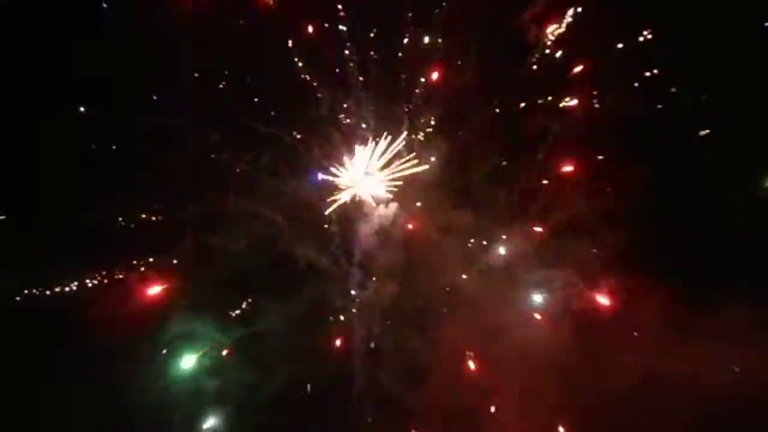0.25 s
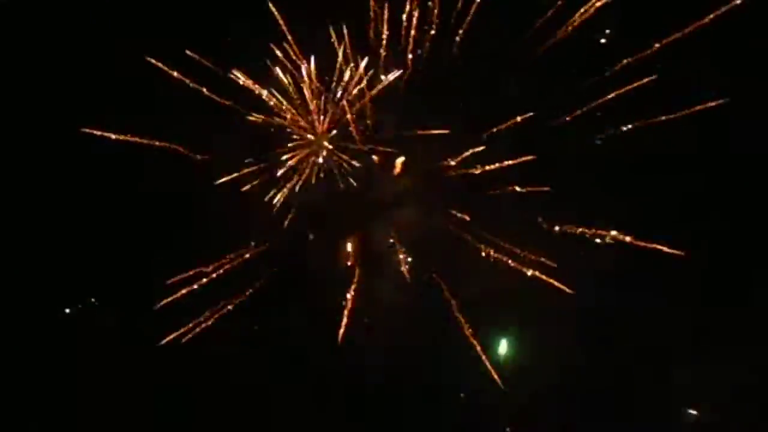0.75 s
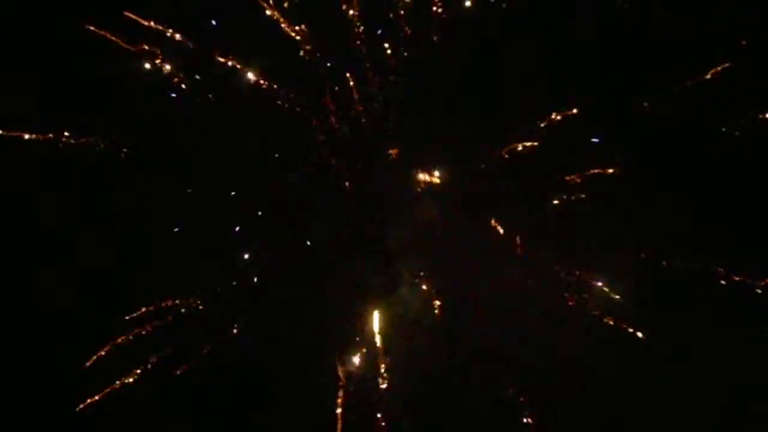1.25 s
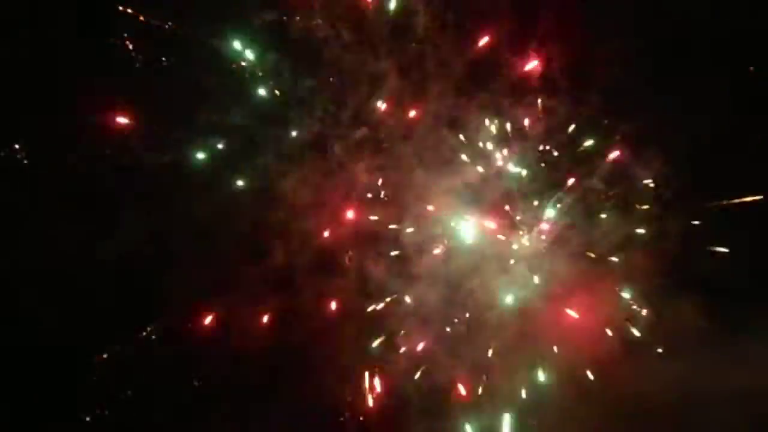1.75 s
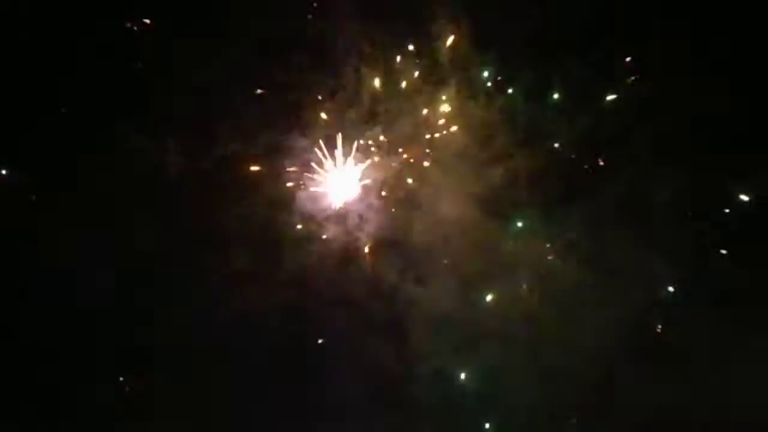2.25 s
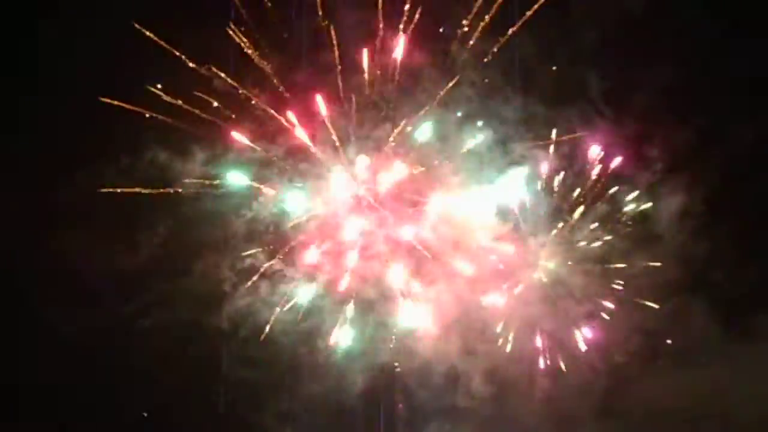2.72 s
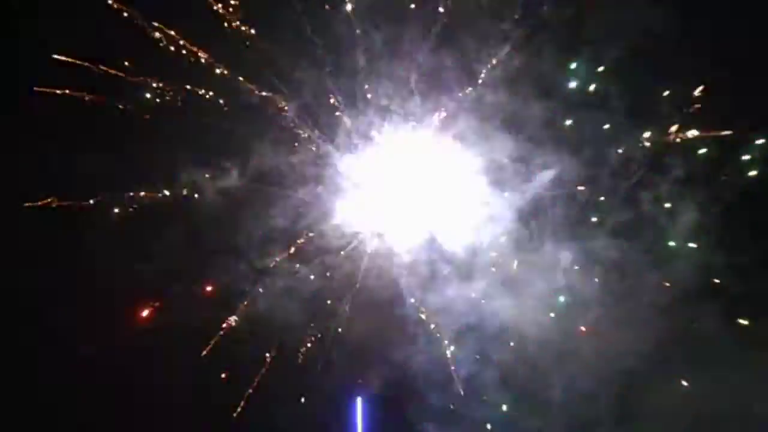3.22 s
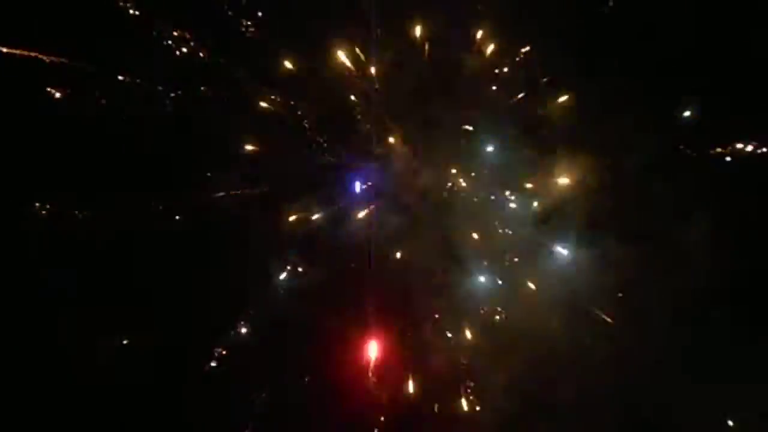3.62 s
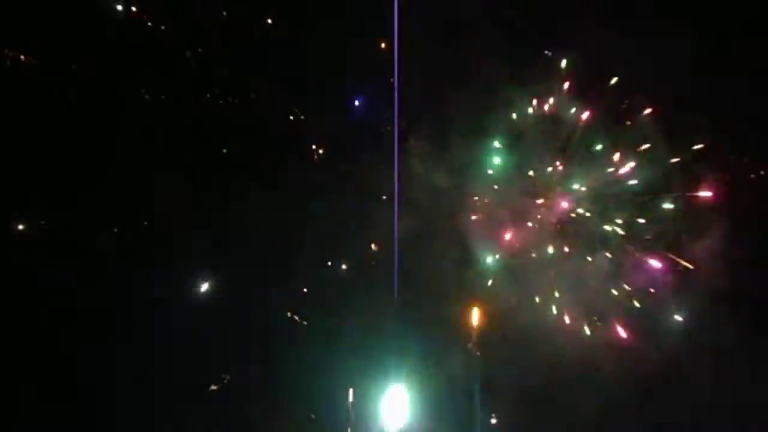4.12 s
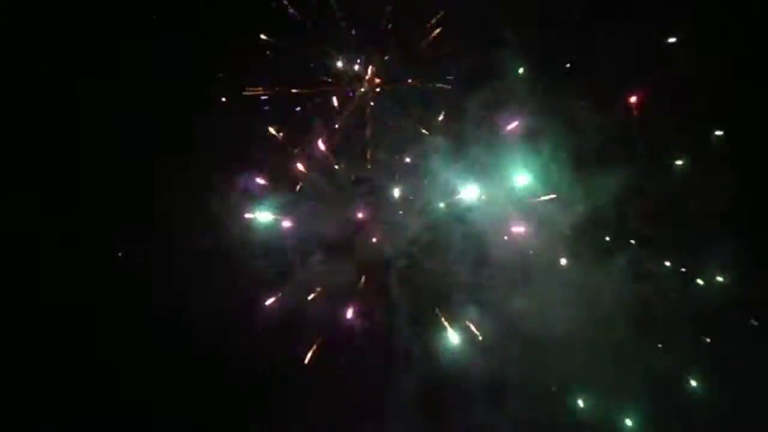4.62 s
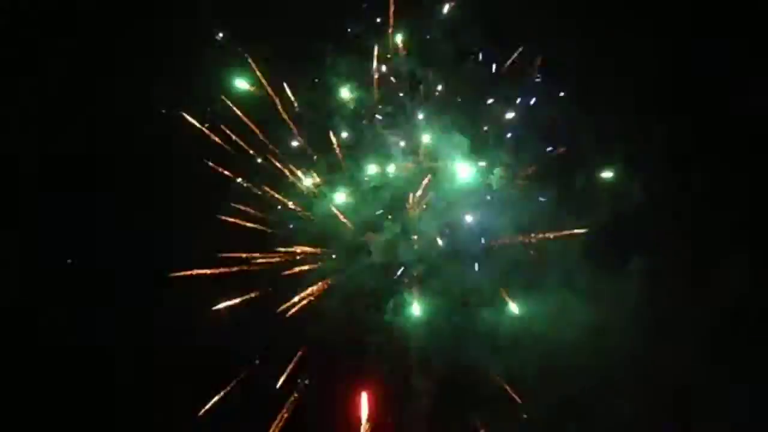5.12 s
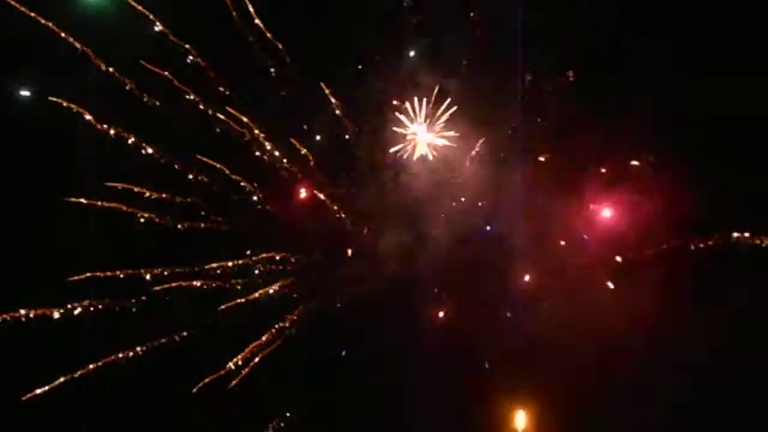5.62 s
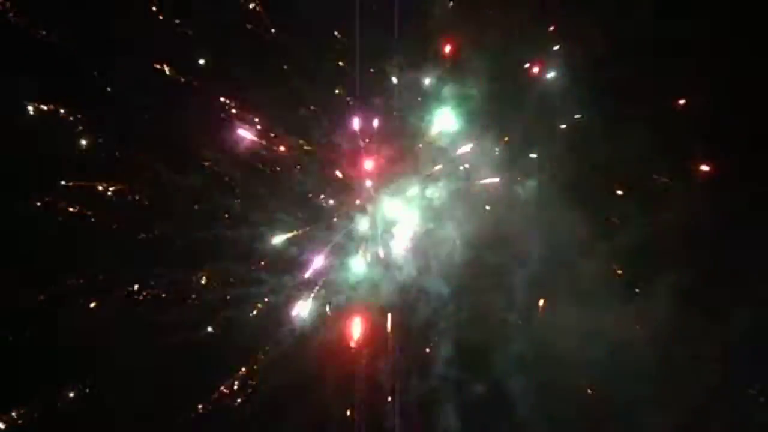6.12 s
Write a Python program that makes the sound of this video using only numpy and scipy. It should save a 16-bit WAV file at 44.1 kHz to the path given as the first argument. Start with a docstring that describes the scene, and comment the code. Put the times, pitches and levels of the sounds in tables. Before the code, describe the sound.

A dense night fireworks barrage: sharp overloaded bangs, irregular pops and double launch thumps over distant rumble, rushing comets and thin crackling fizz.

```python
"""Batteries of fireworks at night, close to a small microphone, over a distant roar, a rush and a fizz.
Pops open the scene and return throughout; shells soon burst overhead, and lift charges thump from 1.2 s on.
Each of these is a sudden push of air with a swing back, then scattered rattle and a longer noisy tail.
A burst also bounces off the ground about 10 ms later, and a wall answers about 0.12 s later.
Bursts knock the microphone's resting level off centre, and the strongest shocks overload its input."""
import sys
import numpy as np
from scipy import signal
from scipy.fft import rfft, irfft
from scipy.io import wavfile
from scipy.ndimage import uniform_filter1d

SR = 44100
rng = np.random.default_rng(int(sys.argv[2]) if len(sys.argv) > 2 else 0)


def unload_audio(sound):
    """Save the sound as a 16-bit wav file, at the path given as the first command line argument."""
    columns = np.transpose(np.atleast_2d(sound))
    # keep every value between -1 and 1, then stretch to whole-number steps
    steps = np.round(np.clip(columns, -1, 1) * 32767)
    wavfile.write(sys.argv[1], SR, steps.astype(np.int16))


N = 280464  # samples, about 6.4 s

# Fronts of shells bursting overhead; the faint row at 4.9946 s is a second front of the burst before it:
# start_s, crack_db, rebound_db, bias_jump (1 = full scale, before the input), bounce_delay_ms, bounce_db,
# bounce_bias_jump (same unit), scatter_db (before a shared boost), wall_echo_db
BURSTS = [(0.3678, 9.5, -3, 0.56, 10.3, -0.5, 0.27, -32.5, -15),
          (0.732, 5.5, 2, 0.82, 11.3, 5, -0.02, -34.5, -17),
          (1.4781, -1, 8, 0.89, 9.8, -4.5, -0.044, -38.5, -25),
          (1.5178, 5.5, -3, 0.013, 10.1, -6.5, 0.054, -43.5, -29),
          (2.0584, -1, -27, 2, 9.06, -1.5, -0.6, -28.5, -7),
          (2.3804, 8.5, 3, 0.46, 10.6, 6, 0.37, -36, -14.5),
          (2.6085, 10, 6, 0.84, 9.6, 1, -0.093, -38.5, -42),
          (2.684, 7, -1.5, -0.032, 9.7, -5.5, 0.09, -41, -25),
          (3.37, 11, 1.5, 1.02, 10.5, 4.5, -0.055, -34.5, -16.5),
          (3.863, 9.5, 9, 1.21, 10.3, -1.7, 0, -39.5, -29.5),
          (4.452, 11, 2, 0.52, 10.25, 11, 0, -32.5, -31),
          (4.518, 2, -2.5, 0.47, 11.0, -5.5, 0.084, -45.5, -29),
          (4.8685, 2, 4.5, 0.68, 9.9, -3.5, -0.034, -40.5, -43),
          (4.9491, -1, -13, 0.17, 10.2, -8.5, 0.12, -47.5, -29),
          (4.9924, 1, -26, 0.12, 10.5, -8.5, 0.15, -45, -21.5),
          (4.9946, -22, -32, -0.29, 10.4, -30, 0.15, -51, -44),
          (5.749, 1, -12.5, 0.32, 10.4, -10.5, 0.14, -46.5, -34),
          (6.0244, 9, 2.5, 0.05, 9.6, -4, 0.055, -38.5, -22)]
# Background before the input: time_s, distant_roar_db, comet_rush_db, burning_star_fizz_db
BACKGROUND = [(0.0, -37.5, -52.5, -57), (0.16, -47, -58.5, -67), (0.34, -41, -48.5, -60.5),
              (0.55, -34, -45.5, -53), (0.78, -34, -44, -58), (0.96, -40, -50, -58),
              (1.56, -42, -61.5, -59.5), (1.9, -35.5, -39.5, -58), (2.07, -23.5, -32.5, -48),
              (2.21, -29.5, -42, -43.5), (2.53, -30, -43.5, -50), (2.74, -39, -50.5, -59),
              (3.24, -40.5, -52.5, -57.5), (3.49, -31.5, -43.5, -55), (3.65, -43.5, -54.5, -62),
              (4.2, -37, -53, -61), (4.38, -34, -47.5, -60), (4.57, -32.5, -45.5, -56),
              (4.96, -44, -54.5, -60), (5.08, -42.5, -52, -57), (5.33, -38.5, -53, -56),
              (5.53, -32, -46.5, -59), (5.81, -41.5, -54.5, -57.5), (6.36, -35, -46.5, -58.5)]

# Every front below is one row: start_s, push_db, push_ms, crack_db, rebound_db, swing_ms, ringing (0-1),
# scatter_db, treble_db (bright over dull scatter), tail_db. Scatter and tail get a shared boost later.


def burst_fronts():
    """A burst's front is a very short, sharp push, followed by a longer one bounced off the ground."""
    rows = []
    for start_s, crack_db, rebound_db, _, delay_ms, bounce_db, _, scatter_db, _ in BURSTS:
        rows.append((start_s, crack_db - 0.5, 0.13, crack_db, rebound_db, 1.69, 0.17,
                     scatter_db, -2.5, scatter_db - 0.5))
        # the bounce has little crack but a brighter scatter
        rows.append((start_s + delay_ms / 1000, bounce_db, 0.85, bounce_db - 22, bounce_db - 13.5, 0.5, 0.28,
                     scatter_db - 0.5, 7.5, scatter_db))
    return rows


def scatter_treble_db(crack_db):
    """For lift charges and pops, a sharper crack gives a brighter scatter."""
    return 9 + 0.32 * crack_db


def lift_fronts():
    """A lift charge is a double thump: one push, then a weaker and longer one."""
    # start_s, push_db, crack_db, scatter_db, tail_db
    lifts = [(1.1626, 4, -14, -44.5, -36), (2.2916, 5, -28, -45, -46), (4.1487, 4.5, 7, -50.5, -37),
             (5.414, -6, -6, -51, -42), (5.461, -5, -16, -42.5, -49)]
    second_delay_ms, second_db = 3.3, -4.5
    rows = []
    for start_s, push_db, crack_db, scatter_db, tail_db in lifts:
        second_push_db, second_crack_db = push_db + second_db, push_db - 27
        rows.append((start_s, push_db, 0.93, crack_db, push_db - 9, 1.4, 0.35,
                     scatter_db, scatter_treble_db(crack_db), tail_db))
        rows.append((start_s + second_delay_ms / 1000, second_push_db, 1.09, second_crack_db,
                     second_push_db - 9, 2.3, 0.35, scatter_db + second_db,
                     scatter_treble_db(second_crack_db), tail_db + 2 * second_db))
    return rows


def pop_fronts():
    """A single report or pop is one push, with its own rebound length and ringing."""
    # start_s, push_db, crack_db, rebound_db, rebound_length_ms, ringing (0-1), scatter_db
    pops = [(0.0332, -7.5, -16, -23, 1.3, 0.3, -45.5), (0.1007, -7, -9, -37, 1.8, 0.25, -43),
            (0.1955, -28, -34, -44, 0.51, 0.25, -53), (0.294, -33, -45, -38, 1.2, 0.25, -59),
            (0.8671, 5, -8, -6, 0.46, 0.75, -32.5), (0.9205, -10.5, -39, -16, 1.14, 0.91, -43),
            (0.9246, -0.5, -11, -5.5, 0.85, 0.62, -38), (1.2355, -4.5, -56, -13.5, 1.24, 0.93, -38),
            (1.256, -11, -32, -40, 0.4, 0.25, -32), (1.259, -4, -7.5, -9, 0.79, 0.25, -55),
            (1.2959, -5, -4.5, -8, 1.7, 0.2, -42), (1.441, -32, -41, -22, 1.2, 0.2, -49),
            (1.9097, -25, -57, -25.5, 1.11, 0.95, -44), (2.0717, -4, -42, -5, 1.6, 0, -44),
            (2.1879, 12, 0.6, -10, 2.5, 0, -27.5), (2.1926, -23, -29, -25, 1.4, 0.25, -60),
            (2.2819, -17, -29, -29, 2.1, 0.25, -46), (2.3648, -1.5, -42, -8.5, 0.87, 0.94, -36.5),
            (2.3821, -20, -19, 2, 2.2, 0.25, -46), (2.404, -0.5, -10, -12, 1.5, 0.2, -35.5),
            (2.7803, -20, -37, -17.5, 1.13, 0.74, -53), (2.9724, -5, -5.5, -5.5, 1.3, 0.65, -35.5),
            (3.109, 0.5, -9, -17, 1.7, 0.4, -37.5), (3.5021, -1, -11, -4.5, 1.4, 0.46, -39),
            (3.6189, -3.5, -3, -25, 1.5, 0.63, -37.5), (3.8403, 5, -7.5, -5, 1.9, 0.05, -32),
            (4.2217, -5, -40, -9, 0.95, 0.6, -38), (4.2303, -17, -55, -15.5, 1.8, 0.8, -47),
            (4.4261, -14, -39, -30, 0.73, 0.98, -39.5), (4.4798, 1, -3, -3, 1.05, 0.1, -39),
            (4.5454, -14, -13, -10, 0.74, 0.75, -52), (4.6124, -14.5, -48, -26, 0.81, 0.25, -44),
            (4.7447, -1.5, -6.5, -8, 1.56, 0.65, -40), (5.0367, -14, -23, -34, 1.5, 0.2, -45),
            (5.3412, 2, -24, -0.5, 0.795, 0.81, -29.5), (5.4818, -8, -45, -19, 0.98, 0.5, -47),
            (5.5341, -8, -41, -8, 0.97, 0.75, -38.5), (5.5904, -7, -6.5, -3.5, 1.3, 0.58, -38.5),
            (5.691, -3, -6, -15, 0.67, 0.73, -40.5)]
    rows = []
    for start_s, push_db, crack_db, rebound_db, swing_ms, ringing, scatter_db in pops:
        rows.append((start_s, push_db, 0.61, crack_db, rebound_db, swing_ms, ringing,
                     scatter_db, scatter_treble_db(crack_db), scatter_db - 7))
    return rows


def shock(push, push_ms, crack, rebound, swing_ms, ringing):
    """A sudden push (negative at this microphone) sags to zero, then the pressure swings the other way."""
    t_ms = np.arange(700) / SR * 1000
    swings = np.maximum(t_ms - push_ms, 0) / swing_ms  # half-swings since the push ended
    first_lobe = np.sin(np.pi * np.minimum(swings, 1) ** 0.7) * np.exp(-0.8 * swings)
    share = np.clip(ringing, 0, 1)  # more ringing: stronger later lobes that last longer
    later_lobes = share * np.sin(np.pi * np.maximum(swings, 1)) * np.exp(-0.4 - (1 - share) * swings)
    sagging_push = -push * np.cos(np.pi / 2 * t_ms / push_ms)
    body = np.where(t_ms < push_ms, sagging_push, rebound * (first_lobe + later_lobes))
    # a steep front rings the microphone capsule at 7.7 kHz
    ring = np.sin(2 * np.pi * 7.7 * t_ms) * np.exp(-t_ms / 0.1)
    rise_ms = 0.16 + 0.05 * np.exp(-25 * crack / push)  # fronts without a crack arrive rounded
    return body * np.minimum(t_ms / rise_ms, 1) - crack * ring


def direct_fronts(rows):
    """The shocks of all bursts, bounces, lift charges and pops."""
    fronts = np.zeros(N)
    for start_s, push_db, push_ms, crack_db, rebound_db, swing_ms, ringing, *_ in rows:
        add(fronts, start_s, shock(gain_of(push_db), push_ms, gain_of(crack_db), gain_of(rebound_db),
                                   swing_ms, ringing))
    return fronts


def wall_echoes():
    """Each facet of a wall returns a burst's front as a small late shock."""
    # Facets of the wall: delay_ms, level_db (over the front's wall_echo_db), push_length_ms
    facets = [(113.7, -6, 0.39), (119.5, -5.5, 1), (123.4, 2, 0.68), (131, -12, 0.22)]
    echoes = np.zeros(N)
    for start_s, *_, wall_db in BURSTS:
        for delay_ms, level_db, push_ms in facets:
            size = gain_of(wall_db + level_db)
            add(echoes, start_s + delay_ms / 1000, shock(size, push_ms, 0.14 * size, 0.28 * size, 1.3, 0.3))
    return echoes


def patter():
    """Small separate reflections: sparse pushes of uneven size in a haze, coloured by the surroundings."""
    # Colour of the scattered sound: pitch_hz, level_db (relative, per Hz)
    scatter_colour = [(88, -13), (150, -16), (256, 7.5), (645, 3), (1450, -8.5), (1960, -8), (2730, -14.5),
                      (3940, -14), (5920, -16.5), (8730, -23), (10300, -21), (12400, -51), (16100, -81),
                      (22000, -120)]
    sizes = gain_of(4.65 * np.minimum(rng.exponential(1, N), 3))
    pushes = -sizes * (rng.random(N) < 900 / SR)  # about 900 per second
    colour = gain_of(read(scatter_colour, np.fft.rfftfreq(N, 1 / SR)))
    coloured = irfft(rfft(pushes) * colour, N)
    haze = evened(noise(scatter_colour, 3.4))
    return evened(evened(coloured) + gain_of(-1.5) * haze)


def rattle(rows):
    """Every front switches on the patter for a moment; its dull and bright parts are set apart."""
    dull_level, bright_level = np.zeros((2, N))
    t = np.arange(2500) / SR
    # a quick fade (60 dB in 9.9 ms) over a weaker, slower one (60 dB in 56 ms)
    fade = gain_of(-60 * t / 0.0099) + gain_of(-10 - 60 * t / 0.056)
    shape = np.minimum(t / 0.000087, 1) * fade
    for start_s, *_, scatter_db, treble_db, _ in rows:
        add(dull_level, start_s + 0.00038, gain_of(scatter_db) * shape)
        add(bright_level, start_s + 0.0001, gain_of(scatter_db + treble_db) * shape)
    for start_s, *_, wall_db in BURSTS:  # the wall's diffuse echo swells and fades
        add(dull_level, start_s + 0.0942, gain_of(wall_db - 32) * np.hanning(2600))
    reflections = patter()
    dull = signal.oaconvolve(reflections, signal.firwin(129, 1500, fs=SR), "same")
    bright = reflections - dull
    return gain_of(23) * (dull_level * dull + bright_level * bright)


def long_tail(rows):
    """Every front sets off the same second of noise, which swells for 18 ms and then dies away."""
    # Colour of the tail: pitch_hz, level_db (relative, per Hz)
    tail_colour = [(120, -37), (200, 2.5), (508, -7), (604, -4.5), (769, -6.5), (853, -12), (1510, -16.5),
                   (2620, -18), (4800, -22.5), (9740, -26), (12400, -36), (16100, -85), (22000, -120)]
    # Time the tail takes to fall by 60 dB: pitch_hz, fall_time_s
    fall_times = [(300, 0.71), (1000, 0.87), (3000, 0.66), (8000, 0.59)]
    kicks = np.zeros(N)
    for start_s, *_, tail_db in rows:
        add(kicks, start_s, gain_of([tail_db]))
    swell = np.minimum(np.arange(SR) / SR / 0.018, 1)
    tail = noise(tail_colour, 2.8, SR, fall_times) * swell
    return gain_of(33) * signal.fftconvolve(kicks, tail / np.linalg.norm(tail))[:N]


def bias():
    """The microphone's resting level steps just after a burst's front and again after its bounce."""
    jumps = np.zeros(N)
    for start_s, _, _, jump, delay_ms, _, bounce_jump, _, _ in BURSTS:
        # each step is spread over 14 samples
        add(jumps, start_s + 0.0003, np.full(14, jump / 14))
        add(jumps, start_s + (delay_ms + 0.5) / 1000, np.full(14, bounce_jump / 14))
    return np.cumsum(jumps)


def background_db(column):
    """Follows one column of the background levels smoothly through time."""
    table = np.transpose(BACKGROUND)
    return np.interp(np.arange(N) / SR, table[0], table[column])


def distant_roar():
    """Echoes from afar blur into low noise whose level is lumpy."""
    # Colour of the roar: pitch_hz, level_db (relative, per Hz)
    roar_colour = [(18, -52), (30, -30), (91, -5.5), (270, -10.5), (419, -5), (526, -8.5), (774, -11.5),
                   (1140, -19), (1310, -21), (2000, -25), (2600, -43), (4400, -120)]
    slow_noise = uniform_filter1d(uniform_filter1d(rng.standard_normal(N), size=700), size=700)
    lumps_db = 1.8 * evened(slow_noise)
    return gain_of(background_db(1) + lumps_db) * evened(noise(roar_colour, 2.1))


def comet_rush():
    """Rising comets rush through the air as noise that is strongest near 3 kHz."""
    # Colour of the rush: pitch_hz, level_db (relative, per Hz)
    rush_colour = [(700, -20), (1300, -8), (2300, -4), (3050, 0), (3600, -8), (5200, -14), (8000, -27),
                   (11000, -40)]
    return gain_of(background_db(2)) * evened(noise(rush_colour, 1.7))


def star_fizz():
    """Burning stars hiss and spit tiny crackles, each a very short 6 kHz ring."""
    # Colour of the hiss: pitch_hz, level_db (relative, per Hz)
    fizz_colour = [(710, -28), (1200, -17), (2330, -8), (2810, -7), (7660, -10.5), (8260, -15),
                   (10100, -14), (11500, -42), (15000, -74), (22000, -120)]
    sizes = gain_of(4.5 * np.minimum(rng.exponential(1, N), 3))
    sparks = sizes * (rng.random(N) < 60 / SR)  # about 60 per second
    t = np.arange(30) / SR
    snap = np.sin(2 * np.pi * 6000 * t) * np.exp(-t / 0.0001)
    crackles = evened(np.convolve(sparks, snap)[:N])
    hiss = evened(noise(fizz_colour, 2.5))
    return gain_of(background_db(3)) * (hiss + gain_of(-2.5) * crackles)


def noise(spectrum, patchy_db, length=N, fall_times=None):
    """Noise of a given colour, with patches drifting in time and pitch; its bands may die away."""
    hop = 128
    frames, hz = length // hop + 5, np.fft.rfftfreq(512, 1 / SR)
    real, imaginary, patches = rng.standard_normal((frames, 257, 3)).T
    patches = uniform_filter1d(uniform_filter1d(patches, size=6, axis=0), size=8, axis=1)
    level_db = read(spectrum, hz)[:, None] + patchy_db * evened(patches)
    if fall_times:
        frame_s = np.arange(frames) * hop / SR
        level_db = level_db - 60 * frame_s / read(fall_times, hz)[:, None]
    short_spectra = (real + 1j * imaginary) * gain_of(level_db)
    return signal.istft(short_spectra, nperseg=512, noverlap=512 - hop)[1][:length]


def gain_of(db):
    """Turns decibels into a factor."""
    return 10 ** (np.asarray(db) / 20)


def evened(x):
    """Scales a signal to an average (rms) strength of 1."""
    return x / np.sqrt(np.mean(x ** 2) + 1e-20)


def read(points, hz):
    """Reads a curve between its points, on a logarithmic pitch axis."""
    point_hz, value = np.transpose(points)
    return np.interp(np.log(hz + 1), np.log(point_hz + 1), value)


def add(mix, start_s, sound):
    """Mixes a sound in at a given time."""
    part = mix[round(start_s * SR):][:len(sound)]
    part += sound[:len(part)]


def scene():
    """All sources meet at one microphone."""
    rows = burst_fronts() + lift_fronts() + pop_fronts()
    shocks = direct_fronts(rows) + wall_echoes() + rattle(rows) + long_tail(rows)
    background = distant_roar() + comet_rush() + star_fizz()
    return (shocks + bias() + background)[None]


def low_cut(x, corner_hz):
    """A coupling capacitor lets a steady offset drain away."""
    return signal.lfilter([1, -1], [1, -np.exp(-2 * np.pi * corner_hz / SR)], x)


def record(dry):
    """Two capacitors let the bias settle, the input clips, then the treble is coloured and cut off."""
    # Treble response of the microphone: pitch_hz, level_db
    microphone = [(9600, -0.5), (10400, 0), (10900, -10.5), (12000, -9.5), (12600, -32), (16000, -20)]
    x = low_cut(low_cut(dry, 3.2), 7.8)
    x = np.clip(x, -0.68, 0.66)
    x = low_cut(x, 0.18)  # a third capacitor makes the flat tops sag
    hz = np.linspace(0, SR / 2, 513)
    colour = signal.firwin2(301, hz, gain_of(read(microphone, hz)), fs=SR)
    band_limit = signal.firwin(1023, 16600, window=("kaiser", 9), fs=SR)  # cuts above 16.6 kHz
    return signal.oaconvolve(x, np.convolve(colour, band_limit)[None], "same")


dry = scene()
out = record(dry)
unload_audio(out)
```